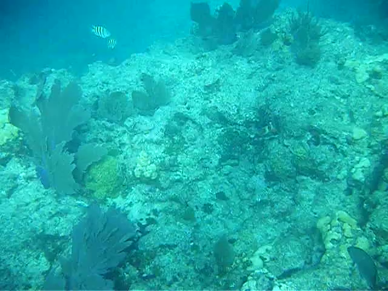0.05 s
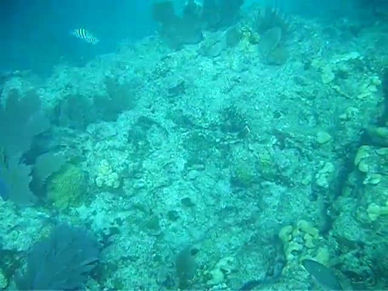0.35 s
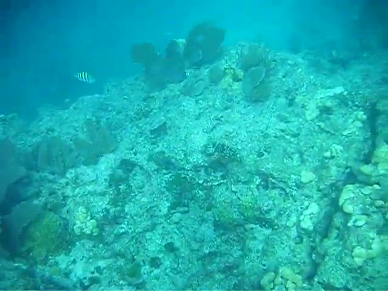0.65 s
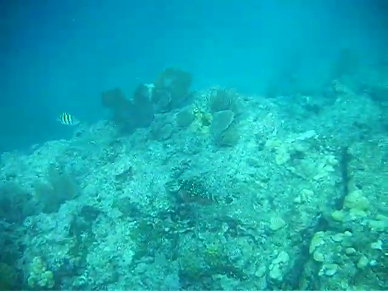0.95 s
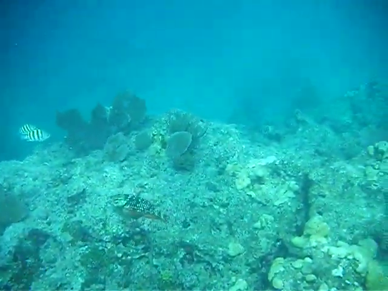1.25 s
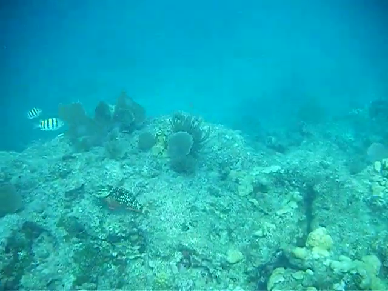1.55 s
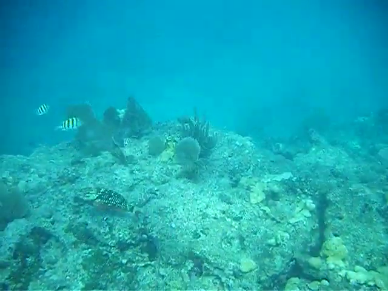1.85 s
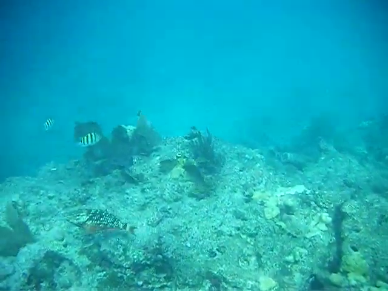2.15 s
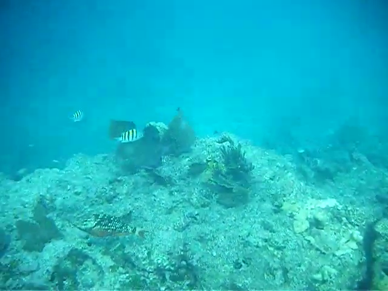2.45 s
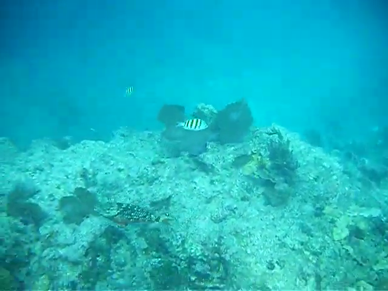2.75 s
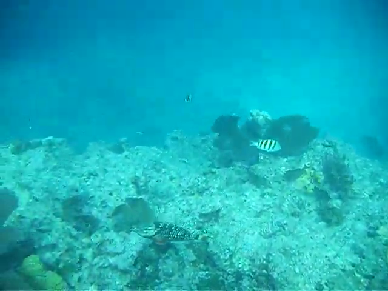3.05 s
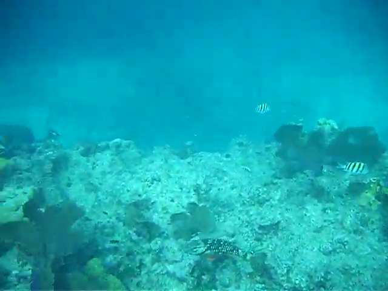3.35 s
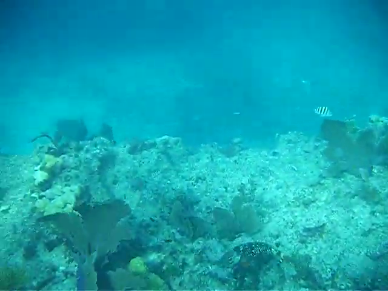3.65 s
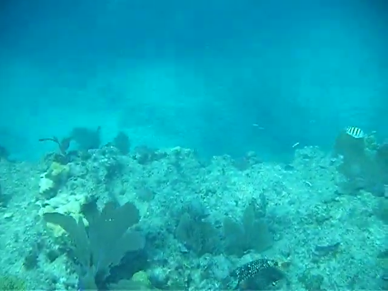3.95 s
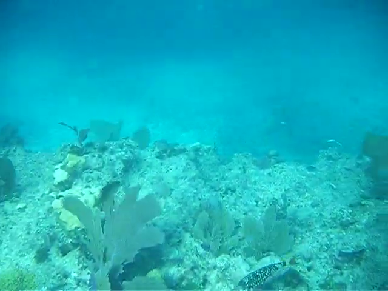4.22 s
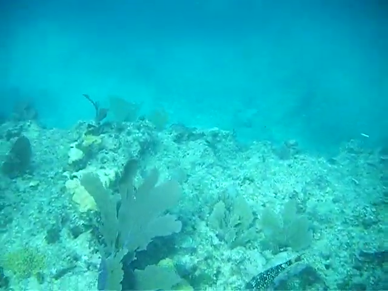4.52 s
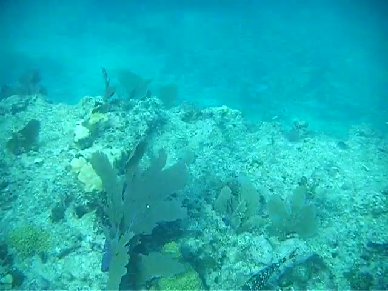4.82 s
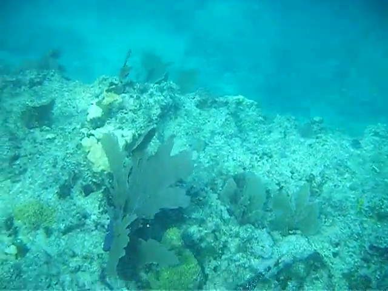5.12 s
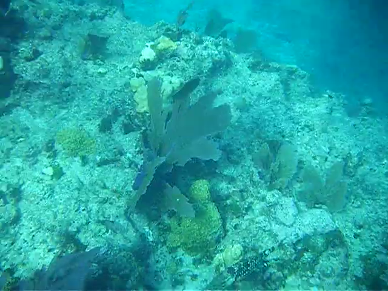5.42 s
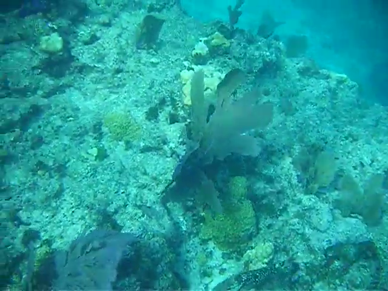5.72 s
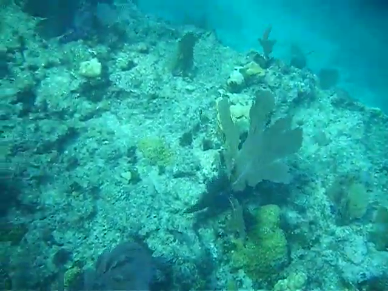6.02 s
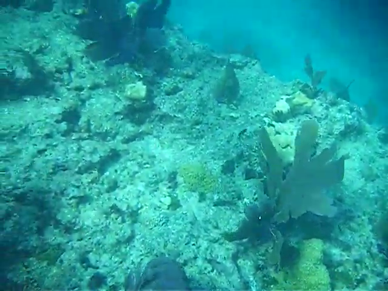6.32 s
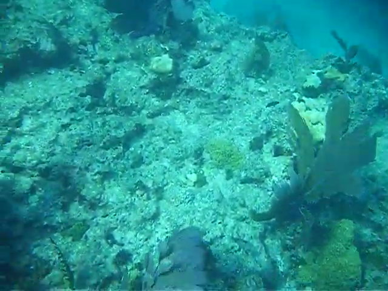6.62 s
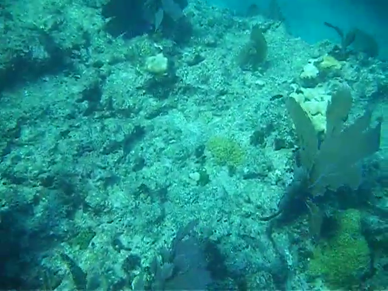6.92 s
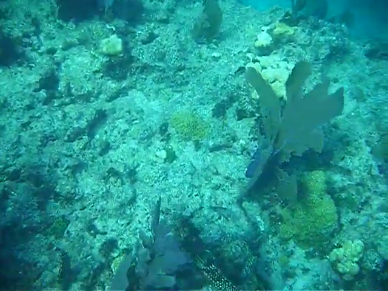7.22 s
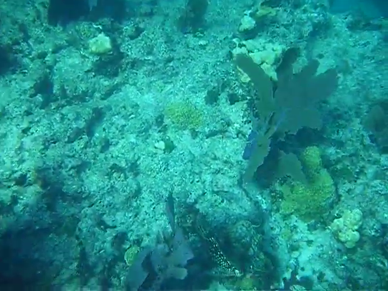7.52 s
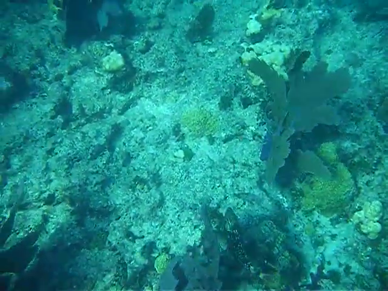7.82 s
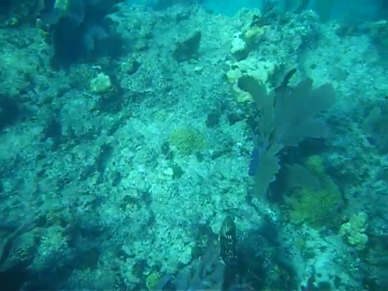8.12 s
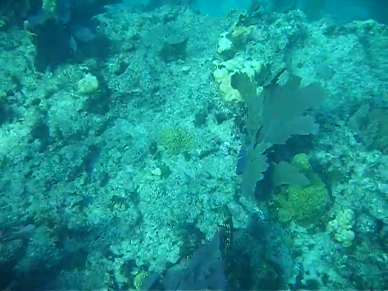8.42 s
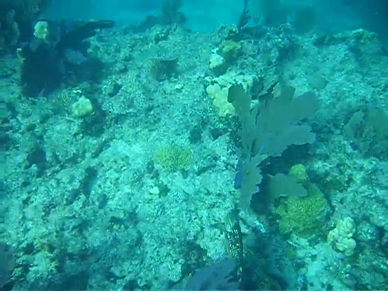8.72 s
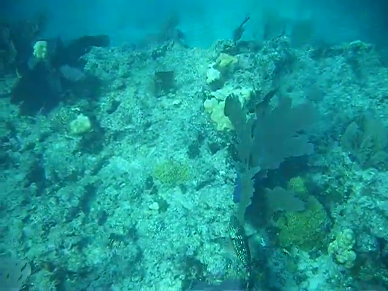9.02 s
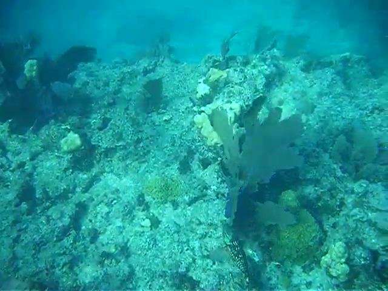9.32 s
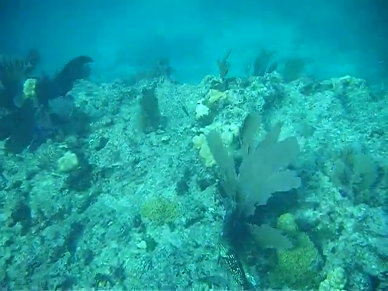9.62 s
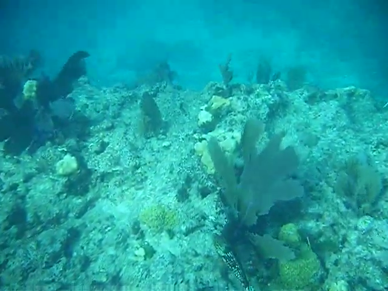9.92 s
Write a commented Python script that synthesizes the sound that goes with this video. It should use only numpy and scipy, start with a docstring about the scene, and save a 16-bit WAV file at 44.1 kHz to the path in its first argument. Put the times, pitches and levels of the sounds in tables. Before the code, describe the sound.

Underwater on a reef, dull bubbling and gurgling runs throughout, swelling in short gushes and broken by uneven clusters of hollow knocks as air hits the camera housing. The hardest knocks slightly overload the enclosed microphone. Small, sharp shrimp clicks are scattered over a faint fizz, while moving water makes a soft wash and a low rumble. The sound is close and muffled, with little treble.

```python
"""Pockets of air knock and gurgle against the waterproof case of a camera drifting over a coral reef.
Each pocket is a damped oscillator that shakes the case; free bubbles, less damped, ring on as tones.
Snapping shrimp crackle near and far, and the passing water adds a hollow wash and a low rumble.
The case muffles the sound and lends it hollow resonances; the hardest knocks overload the microphone."""
import sys
import numpy as np
from scipy import signal
from scipy.fft import irfft
from scipy.io import wavfile
from scipy.ndimage import uniform_filter1d

SR = 44100
rng = np.random.default_rng(int(sys.argv[2]) if len(sys.argv) > 2 else 0)


def digitize_waveform(pressure):
    """Quantize a signal to 16-bit integers and store it at the path in sys.argv[1].

    Rows of a 2-D input are taken as channels; values are limited to [-1, 1].
    """
    field = np.atleast_2d(pressure).T
    bounded = np.clip(field, -1, 1)
    quanta = np.round(bounded * 32767).astype(np.int16)
    wavfile.write(sys.argv[1], SR, quanta)


N = 439236
TAPS = 4096
HZ = np.fft.rfftfreq(TAPS, 1 / SR)
TIME = np.arange(N) / SR

# knocks on the case, mostly air pockets striking it; the brightest come with close shrimp snaps that shake the
# case: (t/s, peak level/dB, f/Hz, hardness as treble gain/dB)
KNOCKS = [(.045, -4, 630, -19.5), (.115, -2, 460, -25), (.135, -1, 470, -23), (.199, -12.5, 610, -13),
          (0.2176, -8.5, 396, -18), (.229, -7.5, 484, -11), (.2815, -5.5, 460, -28), (.339, -14.5, 654, 6),
          (.517, -13.5, 620, -29), (.609, -9, 707, -4.5), (.793, -4, 620, -40), (1.255, -11.5, 880, -13.5),
          (1.46, -9.5, 436, -10), (1.4746, -5.5, 575, -17), (1.7025, -11, 630, 14), (1.803, -9.5, 630, -19),
          (1.959, -15.5, 497, 1), (2.1535, -14.5, 805, -6), (2.2315, -1.5, 690, -3.5),
          (2.336, -11, 486, -21), (2.3496, 2, 590, -8), (2.385, -1.5, 564, -3), (2.466, -12.5, 497, -12),
          (2.984, -16, 536, -3), (3.1046, -5, 595, -35), (3.2285, -4.5, 536, -23),
          (3.4355, -10.5, 623, -32), (3.571, -11.5, 646, -4), (3.707, -4.5, 630, 2.5), (3.746, -12, 647, 1),
          (3.815, 0, 940, -21), (3.823, -10, 680, -13), (3.8445, -11, 606, -26), (3.945, -10.5, 655, -20),
          (3.9595, -10.5, 272, -4), (4.02, -9.5, 960, -12), (4.037, -1.5, 770, -7),
          (4.0726, -4.5, 850, -28), (4.232, -13, 656, -3), (4.396, -9.5, 600, -7), (4.461, -10.5, 825, -5),
          (4.6286, -3.5, 565, -17), (4.7024, -1.5, 480, -23), (4.776, -8, 550, 5.5),
          (4.796, -15.5, 440, -15), (4.826, -8, 740, -20), (4.860, -5, 660, -9.5), (5.124, -10.5, 900, -18),
          (5.202, -11, 544, -6), (5.341, -4, 620, -35), (5.397, -12.5, 420, -27), (5.419, -12.5, 550, -5),
          (5.458, -16.5, 380, -25), (5.479, -5, 447, -19), (5.5915, -8, 643, -9), (5.613, -8.5, 460, -4),
          (5.639, -13, 850, 3), (5.809, -11.5, 490, -24), (5.8515, -9, 550, -24), (5.945, -11, 750, -19),
          (5.9565, -8, 443, -17), (5.978, -8, 647, -20), (6.009, -11.5, 500, -15), (6.041, -11.5, 595, -18),
          (6.0515, -14.5, 1080, 15), (6.159, -2.5, 1020, -39), (6.173, 2, 490, -11.5),
          (6.197, -15, 620, -13), (6.2088, -13, 444, -5), (6.409, -15.5, 566, -14),
          (6.507, -8.5, 1144, -14), (6.565, -5.5, 510, -16), (6.633, -13.5, 757, -14),
          (6.665, -9.5, 770, -11), (6.742, -5.5, 636, -7), (6.856, -7.5, 660, -6), (6.875, -12, 497, -13),
          (6.921, -7.5, 700, -6.5), (7.062, -6.5, 1100, -12.5), (7.073, -13, 680, -20),
          (7.189, -14, 487, -21), (7.415, -7.5, 453, -21), (7.424, -14.5, 460, -13),
          (7.4785, -9.5, 432, -13), (7.510, -7.5, 490, -24), (7.596, -10.5, 790, -7), (7.618, -5, 447, -8),
          (7.629, -0.5, 606, -20), (7.935, -14, 747, -25), (8.045, -13.5, 533, -31), (8.124, -8, 590, -20),
          (8.150, -2.5, 690, -3), (8.167, -15, 930, 5), (8.186, -11.5, 697, -1.5), (8.251, -14.5, 690, -3),
          (8.421, -8, 473, 1), (8.581, -6, 430, -19), (8.587, -5, 587, -24), (8.890, -10.5, 436, -23),
          (8.958, -4.5, 392, -1), (9.002, -13.5, 950, 20), (9.0946, -5, 583, -41), (9.196, -8.5, 327, -16),
          (9.205, 1.5, 513, -8), (9.5336, -4, 510, -28), (9.597, -10, 620, -4), (9.9045, -8.5, 1210, -30),
          (9.938, -8, 1200, -20.5)]
# freely ringing bubbles: (t/s, level/dB, first f/Hz, last f/Hz, glide time/s)
BUBBLES = [(1.046, -38.5, 1580, 1390, 0.051), (1.182, -21.5, 171, 195, 0.023),
           (1.235, -34.5, 1214, 1080, .025), (2.385, -34, 163, 184, 0.11), (2.758, -22, 840, 950, 0.0092),
           (3.81, -17.5, 957, 832, 0.049), (3.87, -12.5, 800, 810, 0.04), (4.089, -16, 714, 690, 0.027),
           (4.152, -23, 917, 980, 0.016), (4.313, -21.5, 872, 925, 0.02), (4.698, -19.5, 458, 440, 0.016),
           (5.039, -11.5, 446, 476, 0.066), (6.164, -16.5, 960, 835, 0.041), (6.175, -26, 1163, 1085, .033),
           (6.206, -30, 1520, 1400, 0.02), (7.399, -21, 870, 880, .023), (8.049, -23.5, 1450, 1410, 0.012),
           (7.78, -30.5, 136, 123, 0.024), (8.217, -22.5, 845, 800, 0.019), (8.635, -13, 757, 624, 0.044),
           (8.96, -25, 1406, 1510, 0.024)]
# gushes of air that swell and ebb: (middle t/s, length/s, level/dB)
GUSHES = [(0.153, 0.1, -25), (1.432, 0.25, -30), (2.165, 0.38, -29.5), (3.536, 0.069, -27),
          (3.95, 0.23, -21.5), (4.366, 0.077, -27), (5.77, 0.084, -27), (6.583, 0.35, -28.5),
          (7.147, 0.044, -23), (7.477, .14, -24.5), (8.14, 0.31, -27.5), (8.594, 0.11, -23.5),
          (8.966, 0.13, -22.5)]
# claw snaps of the nearest shrimp: (t/s, peak level/dB, f/Hz)
SNAPS = [(0.0401, -14.5, 4500), (0.3384, -19, 3500), (0.363, -28, 3900), (0.4646, -25, 3820),
         (0.526, -21.5, 4160), (0.6422, -26, 4220), (0.8984, -32, 4090), (0.9702, -21, 3880),
         (1.2948, -20, 3190), (1.4375, -22.5, 4350), (1.7014, -20.5, 3420), (2.0298, -16.5, 4260),
         (2.098, -19, 4880), (2.3025, -21.5, 4270), (2.3483, -13.5, 2800), (2.6094, -24, 4550),
         (2.699, -29.5, 4640), (2.7287, -21.5, 3760), (2.814, -17.5, 3950), (2.955, -26, 4440),
         (3.3672, -30, 4350), (3.72, -28, 3370), (3.7371, -23, 4220), (3.907, -28.5, 3850),
         (3.9873, -24.5, 4120), (4.0598, -28, 3710), (4.4333, -20, 2920), (4.529, -19, 4260),
         (4.775, -18.5, 4360), (4.897, -27, 3630), (5.006, -23.5, 4270), (5.7332, -16.5, 4690),
         (6.0506, -24, 3370), (6.1727, -21, 2930), (6.835, -28, 4220), (7.5944, -19.5, 3990),
         (8.3744, -21, 4220), (8.5689, -16.5, 4340), (8.8744, -20.5, 4410), (8.9393, -19, 4040),
         (9.0245, -15, 4280), (9.2036, -25, 2770), (9.3136, -19, 4220), (9.9039, -16, 3780)]
# buffeting as the camera moves through the water: (t/s, level/dB)
BUFFETING = [(0.35, -51), (2.34, -54), (3.35, -45), (5.24, -56), (5.51, -46.5), (6.25, -50), (6.6, -42),
             (7.45, -48), (7.85, -46.5), (9.63, -55.5), (9.9, -53)]
# source spectra before the case resonates: (f/Hz, level/dB)
KNOCK_SPECTRUM = [(30, -21.5), (200, -3), (380, 2), (850, 4.5), (1300, -2), (2200, 5), (3200, -10.5),
                  (5000, -28)]
SNAP_SPECTRUM = [(60, -7.5), (250, 1), (500, 9.5), (900, 4), (1300, 1), (1900, -2.5), (3000, 0),
                 (5200, -2.5), (7000, -16.5)]
WASH_SPECTRUM = [(30, -19.5), (160, -16.5), (280, -12.5), (400, 4.5), (750, -5), (1100, -15), (1800, -34.5),
                 (4000, -42)]
RUMBLE_SPECTRUM = [(15, -5.5), (40, -4.5), (90, -4.5), (180, -9), (300, -10), (1000, -59)]
# resonances of the case: (f/Hz, width/Hz, gain/dB)
CASE_MODES = [(435.4, 134, 8.5), (630, 121, 9), (857, 66, 4), (1464, 99, 9), (2350, 280, 3),
              (4330, 1800, 5.5)]
# frequency response of the sealed microphone: (f/Hz, gain/dB)
MIC_RESPONSE = [(10, -10.5), (30, 1), (4800, 3), (5400, -0.5), (5800, -2), (6200, -38), (7000, -82.5)]


def knocks(middle_q=1.44, middle_hz=600, q_growth=0.28, damping_per_db=0.1161, echo_db=-16, echo_s=0.013):
    """Damping sets the ring: small, high pockets and gentle knocks last more cycles. Each echoes once."""
    out = np.zeros(N)
    for (s, db, hz, treble_db), delay in zip(KNOCKS, rng.uniform(.25, 1, len(KNOCKS))):
        q = middle_q * (hz / middle_hz) ** q_growth * np.exp(-damping_per_db * db)
        glug = amp(db) * air_pocket(hz, hz / q, treble_db)
        add(out, s, glug)
        add(out, s + echo_s * delay, amp(echo_db) * glug)
    return out


def air_pocket(hz, width_hz, treble_db, corner_hz=1100):
    """A damped mass-spring oscillator shakes the case for a few cycles; a soft push lacks treble."""
    resonance = 1 / abs(1 - (HZ / hz) ** 2 + 1j * HZ * width_hz / hz ** 2)
    treble_shelf = HZ ** 4 / (HZ ** 4 + corner_hz ** 4)
    return case_ring(spectrum(KNOCK_SPECTRUM) + treble_db * treble_shelf + 20 * np.log10(resonance))


def bubbles(rise_s=0.0017, fade=1.87, wobble=0.016, flutter_db=2.0):
    """Free oscillation: bubbles ring as near sines, wavering in pitch and level as their shape changes."""
    out = np.zeros(N)
    for s, db, first_hz, last_hz, glide_s in BUBBLES:
        t = np.arange(0, 2 * glide_s, 1 / SR)
        shape = unit_rms(uniform_filter1d(rng.standard_normal(SR), size=200))[:len(t)]
        hz = np.interp(t, [0, glide_s], [first_hz, last_hz]) * (1 + wobble * shape)
        envelope = (1 - np.exp(-t / rise_s)) * np.exp(-fade * (t / glide_s) ** 2)
        gain = amp(db + flutter_db * uniform_filter1d(shape, size=100))
        add(out, s, gain * envelope * np.sin(2 * np.pi * np.cumsum(hz) / SR))
    return out


def gurgle(per_s=115, low_hz=380, high_hz=950, db_per_octave=-4, gain_db=-2.5, sizes=24):
    """Superposition: swarms of small air pockets merge; the larger, lower ones are the stronger."""
    out = np.zeros(N)
    for hz in np.geomspace(low_hz, high_hz, sizes):
        pops = impulses(per_s / sizes, spread_db=4, cap_db=10) * amp(db_per_octave * np.log2(hz / low_hz))
        width_hz = 90 * 2 ** rng.uniform(-1, 2.2)
        out += signal.oaconvolve(pops, air_pocket(hz, width_hz, treble_db=-8))[:N]
    return amp(gain_db) * unit_rms(out) * agitation()


def blips(per_s=20, low_hz=750, high_hz=1550, ring_s=0.0078, db_per_octave=-13, gain_db=-6, sizes=20):
    """Pinch-off excites tiny bubbles into short, damped chirps, louder in stirred water."""
    t, out = np.arange(TAPS) / SR, np.zeros(N)
    envelope = np.exp(-t / ring_s) * (1 - np.exp(-t / 0.0007))
    for hz in np.geomspace(low_hz, high_hz, sizes):
        glide = 3.4 * rng.uniform(-2.2, 1)
        chirp = np.sin(2 * np.pi * hz * t * (1 + glide * t))
        chirp *= envelope * amp(db_per_octave * np.log2(hz / low_hz))
        out += signal.oaconvolve(impulses(per_s / sizes, spread_db=4.5, cap_db=7), chirp)[:N]
    return amp(gain_db) * out * agitation()


def near_shrimp(gain_db=1, echo_db=-14, echo_s=0.0055):
    """Reflection: each close snap is followed by two quick echoes off the reef."""
    out = np.zeros(N)
    for (s, db, hz), delays in zip(SNAPS, rng.uniform(0.11, 1, (len(SNAPS), 2))):
        click = amp(db) * claw_snap(hz, lift_db=10)
        add(out, s, click)
        for delay in delays:
            add(out, s + echo_s * delay, amp(echo_db) * click)
    return amp(gain_db) * out


def claw_snap(hz, lift_db, width_hz=1100):
    """Impulse excitation: a broadband click that rings for a few cycles at its own pitch."""
    return case_ring(spectrum(SNAP_SPECTRUM) + resonance_db(hz, width_hz, lift_db))


def far_shrimp(per_s=220, low_hz=2400, high_hz=5300, gain_db=-52.5, pitches=12):
    """Incoherent addition: distant snaps crackle steadily, and the farthest merge into a fizz."""
    crackle = np.zeros(N)
    for hz in np.linspace(low_hz, high_hz, pitches):
        snaps = impulses(per_s / pitches, spread_db=7, cap_db=17.5)
        crackle += signal.oaconvolve(snaps, claw_snap(hz, lift_db=13))[:N]
    fizz = case_noise(SNAP_SPECTRUM)
    return amp(gain_db) * (unit_rms(crackle) + fizz)


def water_flow(wash_db=-5, easing_db_per_s=0.59, rumble_db=3.5):
    """Turbulence along the case: a hollow wash that eases off, over a low buffeting rumble."""
    wash = amp(wash_db - easing_db_per_s * TIME) * case_noise(WASH_SPECTRUM) * agitation()
    buffeting = amp(rumble_db + np.interp(TIME, *np.transpose(BUFFETING)))
    rumble = buffeting * case_noise(RUMBLE_SPECTRUM) * flurries(depth_db=2.5, step_s=.1)
    return wash + rumble


def agitation(start_db=-26.5, settling_db_per_s=0.57, wake_db=-28.5, wake_s=0.018):
    """Independent motions add in power: settling water, gushes and each knock's wake give one gain."""
    power = amp(start_db - settling_db_per_s * TIME) ** 2
    for s, length, db in GUSHES:
        power += amp(db) ** 2 * np.exp(-(2 * (TIME - s) / length) ** 2)
    wake = np.exp(-TIME[:SR // 2] / wake_s)
    for s, db, _, _ in KNOCKS:
        add(power, s, amp(db + wake_db) ** 2 * wake)
    return np.sqrt(power)


def flurries(depth_db, step_s):
    """Random amplitude modulation: the gain slides to a new value at every step."""
    steps = rng.standard_normal(size=1000)
    return amp(depth_db * np.interp(TIME / step_s, np.arange(len(steps)), steps))


def impulses(per_s, spread_db, cap_db):
    """A Poisson process: impulses of either sign, many faint and a few strong."""
    size = amp(np.minimum(spread_db * rng.exponential(1, N), cap_db))
    return size * rng.choice([-1, 1], N) * (rng.random(N) < per_s / SR)


def case_ring(source_db):
    """Minimum-phase response of the case to an impulse with this spectrum, scaled to a peak of one."""
    modes_db = sum(resonance_db(*mode) for mode in CASE_MODES)
    log_gain = np.log(amp(source_db + modes_db))
    two_sided = np.concatenate([log_gain, log_gain[-2:0:-1]])
    ring = np.fft.ifft(np.exp(np.conj(signal.hilbert(two_sided)))).real
    return ring / abs(ring).max()


def case_noise(points):
    """Source and filter: noise with this spectrum excites the case; the rms is one."""
    return unit_rms(signal.oaconvolve(rng.standard_normal(N), case_ring(spectrum(points)))[:N])


def resonance_db(hz, width_hz, lift_db):
    """A resonance as a Lorentzian peak on the decibel scale."""
    return lift_db / (1 + (2 * (HZ - hz) / width_hz) ** 2)


def spectrum(points):
    """Interpolation of (f/Hz, level/dB) points on a logarithmic frequency axis."""
    hz, db = np.transpose(points)
    return np.interp(np.log(HZ + 1), np.log(hz + 1), db)


def amp(db):
    """Amplitude ratio for a level in decibels."""
    return 10 ** (np.asarray(db) / 20)


def unit_rms(x):
    """Normalisation to a mean power of one."""
    return x / np.sqrt(np.mean(x ** 2) + 1e-20)


def add(mix, s, sound):
    """Superposition of a sound on the mix, starting at s seconds."""
    part = mix[max(round(s * SR), 0):][:len(sound)]
    part += sound[:len(part)]


def scene():
    """Sound pressures add linearly at the one microphone inside the case."""
    return (knocks() + bubbles() + gurgle() + blips() + water_flow() + near_shrimp() + far_shrimp())[None]


def record(dry, overload=.705, knee=7, cutoff_hz=15850):
    """Filtering and saturation: the sealed microphone loses treble and rounds off the hardest knocks."""
    muffle = np.fft.fftshift(irfft(amp(spectrum(MIC_RESPONSE))))[1:]
    dull = signal.oaconvolve(dry, muffle[None], "same")
    clipped = dull / (1 + abs(dull / overload) ** (2 * knee)) ** (.5 / knee)
    lowpass = signal.firwin(511, cutoff_hz, window=("kaiser", 9), fs=SR)
    return signal.oaconvolve(clipped, lowpass[None], "same")


dry = scene()
out = record(dry)
digitize_waveform(out)
```